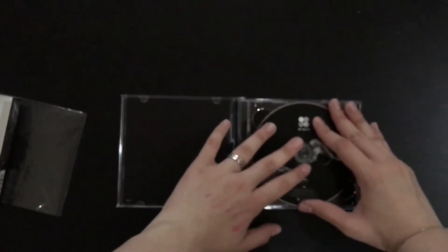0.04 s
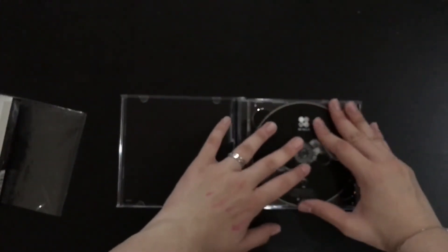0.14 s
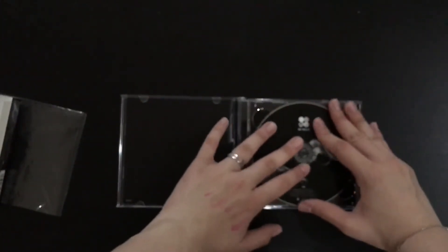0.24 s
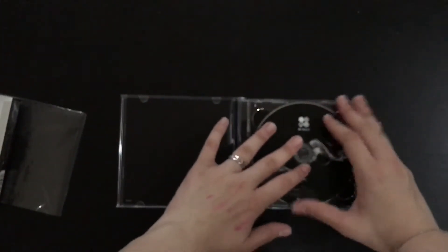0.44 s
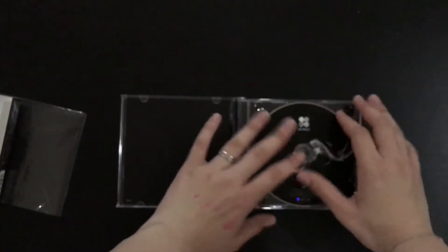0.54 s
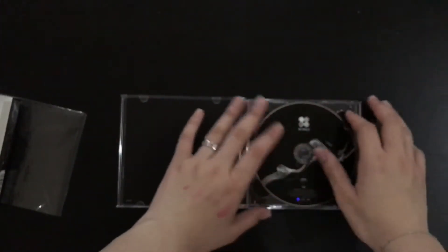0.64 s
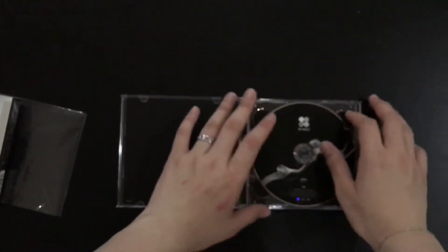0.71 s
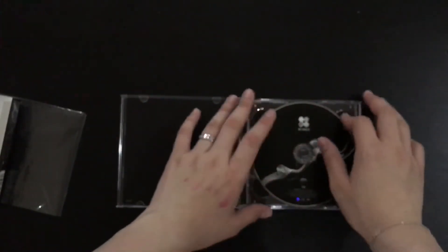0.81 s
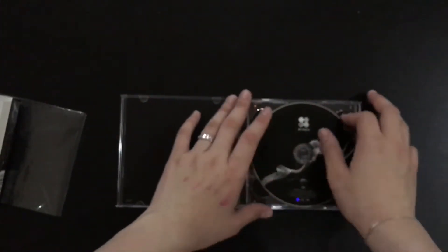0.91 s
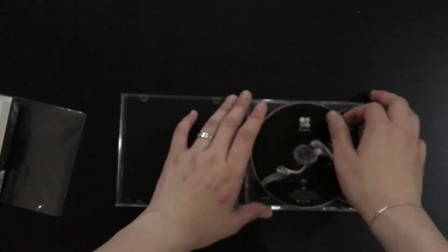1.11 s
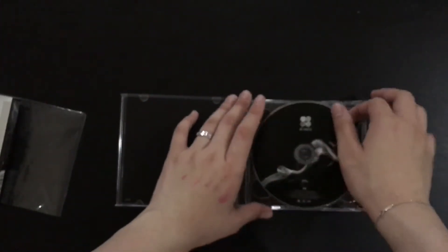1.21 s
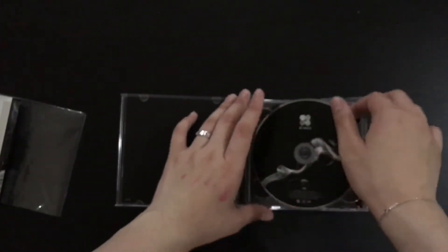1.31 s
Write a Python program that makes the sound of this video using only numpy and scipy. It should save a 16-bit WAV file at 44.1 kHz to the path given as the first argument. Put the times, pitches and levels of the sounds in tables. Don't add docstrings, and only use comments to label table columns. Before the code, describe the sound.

A disc snaps loudly onto a plastic case hub at about 0.21 s, a brittle crackle with a table thump and short small-room ring. Before it, faint hiss, low hum and tiny high finger squeaks. Soft rubbing and faint ticks follow around 0.5 s, two crisp edge clicks at 0.84 and 0.86, then a stuttering creak and scrape from 1.0 to 1.2, ending with small ticks near 1.3. Close microphone.

```python
import sys
import numpy as np
from scipy import signal
from scipy.fft import rfft, irfft
from scipy.io import wavfile
from scipy.ndimage import uniform_filter1d

SR = 44100
rng = np.random.default_rng(int(sys.argv[2]) if len(sys.argv) > 2 else 0)


def persist_wave(psi):
    counts = np.round(np.clip(psi, -1, 1) * 32767).astype(np.int16)
    wavfile.write(sys.argv[1], SR, np.atleast_2d(counts).T)


def volts(x):
    e = np.asarray(x, float) / 20
    return 10 ** e


N = 59535

# (frequency [Hz], level [dB per Hz])
HISS_TONE = [(90, -7.5), (130, 0.5), (350, -5), (700, -12), (1500, -14.5), (4000, -25.5), (16000, -28.5)]
# (frequency [Hz], level [dB per Hz])
HUM_TONE = [(25, -29.5), (45, 3.5), (62, -0.5), (97, -8.5), (125, -20), (200, -32)]
# (time [s], level [dB])
HUM_SWELL = [(0, -8), (.13, -1), (.3, -4), (.55, 2.5), (.75, 0), (1.0, -8), (1.1, -7.5), (1.25, -2),
             (1.35, -13.5)]
# (frequency [Hz], time to fade 60 dB [s])
ROOM_FADES = [(150, 0.25), (450, 0.39), (900, 0.49), (1800, 0.12), (4000, 0.49), (9000, 0.37), (14000, .17)]
ROOM_LEVELS = [-24, -19.5, -19.5, -27.5, -16.5, -25.5, -22]
TABLE_PITCHES = [202, 257, 344, 445, 490, 546, 748, 947, 1100, 1200, 1410]
# (level [dB], time to fade 60 dB [s])
TABLE_RINGS = [(-7, 0.048), (-6.5, 0.07), (-4.5, 0.073), (-2, 0.052), (-14, 0.091), (-12, 0.06), (2, 0.029),
               (-21, 0.049), (-11.5, .02), (-20, .1), (0.5, .05)]
# (time [s], level [dB])
BOOM_KNOCKS = [(.2105, -25), (.8655, -39), (1.2, -48), (1.012, -53.5), (1.3, -41), (1.242, -57), (.44, -57),
               (0.534, -53), (.325, -67)]
# (time [s], level [dB])
NUDGES = [(.555, -59), (0.725, -62.5), (1.177, -58.5), (1.186, -73), (1.191, -59.5), (1.197, -65),
          (1.222, -76), (1.343, -65.5)]
# (start [s], length [s], start pitch [Hz], middle pitch [Hz], end pitch [Hz])
SQUEAKS = [(.02, .09, 14500, 13900, 14500), (.038, .04, 15750, 15600, 15650),
           (.122, .022, 13000, 13250, 13600), (.165, .04, 12800, 13100, 13500),
           (.175, .03, 12300, 12100, 12600), (.51, .036, 13800, 13250, 12700),
           (.71, .075, 13000, 13700, 13900), (.72, .075, 12500, 13250, 12700)]
SQUEAK_LEVELS = [-78, -73, -80, -75, -77, -69, -82, -79]
# (time [s], level [dB])
RUB_PRESSURE = [(0, -74.5), (0.358, -64.5), (.47, -63.5), (.56, -59), (0.614, -64), (.63, -86),
                (0.859, -84), (.9, -69), (0.999, -73.5), (1.011, -62.5), (1.1, -67.5), (1.159, -68),
                (1.201, -65.5), (1.24, -74), (1.3, -74), (1.314, -70.5), (1.35, -64)]
# (frequency [Hz], level [dB per Hz])
RUB_TONE = [(100, -29.5), (350, 2), (1000, -8), (3300, -8.5), (8000, -13), (16000, -15.5)]
# (time [s], level [dB])
SCRAPE_PRESSURE = [(1.163, -99), (1.169, -56), (1.179, -57), (1.189, -53), (1.196, -43.5), (1.206, -61),
                   (1.228, -63.5), (1.25, -80)]
# (frequency [Hz], level [dB per Hz])
SCRAPE_TONE = [(150, 5), (400, 0), (1000, 6), (2200, 1), (3800, -2), (4600, -18), (5500, -40), (16000, -30)]
# (time [s], level [dB], centre [Hz], time to fade 60 dB [s])
TICKS = [(.002, -72, 3200, 0.12), (0.014, -80, 3060, .02), (0.0762, -61.5, 2960, 0.04),
         (0.077, -68.5, 9000, 0.02), (0.121, -81, 8000, .01), (0.12, -69.5, 3530, 0.019),
         (0.208, -33, 2440, 0.0063), (0.2175, -31, 1420, 0.045), (0.869, -71, 3180, 0.0067),
         (0.515, -75, 3860, 0.0063), (0.553, -63, 3270, 0.21), (0.567, -64.5, 7000, 0.016),
         (0.533, -63, 6980, 0.008), (0.586, -72, 3480, 0.016), (.727, -74, 3180, 0.1),
         (1.1786, -51, 3000, 0.011), (1.1852, -59.5, 2420, 0.0079), (1.1913, -47, 3000, 0.012),
         (1.1975, -61.5, 2400, 0.026), (1.172, -53, 3440, 0.012), (1.219, -61, 1110, 0.14),
         (1.313, -69, 6000, 0.0056), (1.3408, -57.5, 3230, 0.016), (1.3435, -55, 514, .03)]
# (start [s], end [s])
CREAK_SPAN = (1.011, 1.071)
# (start rate [Hz], end rate [Hz])
CREAK_RATES = (260, 170)
# (start level [dB], end level [dB])
CREAK_LEVELS = (-54, -56)
# (time [s], level [dB])
LONE_SLIPS = [(1.0112, -47.5), (1.0215, -71), (1.030, -48), (1.0765, -57), (1.0825, -51), (1.0915, -55),
              (1.0985, -49), (1.106, -54), (1.115, -49), (1.1228, -54), (1.130, -50), (1.137, -49),
              (1.1445, -56), (1.152, -48), (1.1665, -49.5), (1.169, -46), (1.216, -54), (1.304, -78),
              (1.315, -50.5)]
# (time [s], level [dB])
CREAK_DRAG = [(1.005, -92.5), (1.012, -70.5), (1.06, -60), (1.1, -72), (1.16, -78), (1.175, -55.5),
              (1.2, -71), (1.23, -100)]
# (frequency [Hz], width [Hz], level [dB])
CREAK_BODY = [(2000, 600, -4), (5200, 1200, -9), (6900, 900, -5), (9100, 1000, -1), (10000, 1200, -8),
              (12500, 3000, -10), (15300, 1200, -8)]
# (peak time [s], level [dB], swell [s], time to fade 60 dB [s], table thump [dB])
TAPS = [
    (0.8361, -40.5, 0.000072, 0.0042, -64.5),
    (0.8626, -41, 0.000109, 0.0073, -47.5),
]
# (frequency [Hz], width [Hz], level [dB])
TAP_BODY = [(3000, 1070, -2.5), (6600, 3500, -3.5), (11370, 1900, -2), (15450, 2000, -27)]
# (peak time [s], level [dB], swell [s], time to fade 60 dB [s], table thump [dB])
BOUNCES = [
    (0.8372, -48, 0.00025, 0.019, -51.5),
    (0.8653, -48, 0.0003, 0.018, -52),
    (0.8676, -47, 0.00027, 0.014, -51.5),
]
# (frequency [Hz], width [Hz], level [dB])
BOUNCE_BODY = [(450, 890, 3.5), (3120, 480, 1), (6530, 3300, -8.5)]
# (peak time [s], level [dB], swell [s], time to fade 60 dB [s], table thump [dB])
CRACKLES = [
    (0.2095, -35.5, .0006, 0.028, -32.5),
    (0.2127, -31, 0.0011, 0.008, -27.5),
    (0.216, -31.5, 0.00086, 0.0039, -24.5),
    (0.2206, -63.5, .001, .01, -29),
]
# (time [s], level [dB])
HARD_SLIPS = [
    (.2121, -18),
    (.2125, -12),
    (.2128, -3),
    (.2158, -24),
]
# (frequency [Hz], width [Hz], level [dB])
PLASTIC = [(743, 290, -2.5), (1420, 430, -3.5), (2310, 520, 0), (2960, 210, -15), (3220, 400, -9.5),
           (3590, 300, -16), (4686, 690, 3.5), (5910, 520, -13.5), (6990, 800, -11), (8740, 1500, -5),
           (10860, 510, -7), (11280, 1200, -4), (12700, 600, -10.5), (15400, 1500, -10)]


def unit(x):
    return x / np.sqrt(np.mean(x ** 2))


def noise():
    return rng.standard_normal(N)


def band(x, hz, width):
    return signal.lfilter(*signal.iirpeak(hz, hz / width, fs=SR), x)


def colour(x, points):
    hz, db = np.array(points).T
    f = np.arange(len(x) // 2 + 1) * SR / len(x) + 1
    gain_db = np.interp(np.log(f), np.log(hz), db, left=-80, right=-80)
    return unit(irfft(rfft(x) * volts(gain_db), len(x)))


def curve(points):
    return volts(np.interp(np.arange(N) / SR, *np.array(points).T))


def fade(t, t60):
    return np.exp(-t * np.log(1000) / t60)


def burst(at, db, swell, t60):
    t = np.arange(N) / SR - at
    return volts(db) * np.exp(np.where(t < 0, t / max(swell, 1e-4), -t * np.log(1000) / t60))


def bursts(rows):
    return sum(burst(*row[:4]) for row in rows)


def push(at, db, length=0.00048):
    return volts(db) * np.exp(-.5 * ((np.arange(N) / SR - at) / length) ** 2)


def clicks(rows):
    out = np.zeros(N)
    for at, db in rows:
        out[int(at * SR)] = volts(db)
    return out


def walk(rate):
    k = int(SR / rate)
    return unit(uniform_filter1d(uniform_filter1d(noise(), k), k))


def hiss():
    return volts(-67) * colour(noise(), HISS_TONE)


def hum():
    return volts(-52) * curve(HUM_SWELL) * colour(noise(), HUM_TONE)


def room(x):
    gap_s = 0.005
    t = np.arange(SR // 2) / SR
    tail = 0
    for (hz, t60), db in zip(ROOM_FADES, ROOM_LEVELS):
        echoes = unit(band(rng.standard_normal(len(t)), hz, 1.1 * hz))
        tail = tail + volts(db) * echoes * fade(t, t60)
    tail = tail * np.clip(t / gap_s - 1, 0, 1) * volts(-30.5)
    return signal.fftconvolve(x, tail)[:N]


def table(force):
    t = np.arange(SR // 2) / SR
    ring = sum(volts(db) * np.sin(2 * np.pi * hz * t) * fade(t, t60)
               for hz, (db, t60) in zip(TABLE_PITCHES, TABLE_RINGS))
    return signal.fftconvolve(force, ring)[:N] / 20


def boom():
    pitch_hz, t60_s, rise_s = 86.6, 0.22, 0.005
    t = np.arange(SR // 2) / SR
    ring = np.sin(2 * np.pi * pitch_hz * t) * fade(t, t60_s) * (1 - np.exp(-t / rise_s))
    return signal.fftconvolve(clicks(BOOM_KNOCKS), ring)[:N]


def nudges():
    return table(sum(push(*row) for row in NUDGES))


def squeaks():
    t, out = np.arange(N) / SR, 0
    for (at, length, start, middle, end), db in zip(SQUEAKS, SQUEAK_LEVELS):
        u = np.clip((t - at) / length, 0, 1)
        f = start * (1 - u) * (1 - 2 * u) + 4 * middle * u * (1 - u) + end * u * (2 * u - 1)
        level = volts(db + 2 * walk(200)) * np.sin(np.pi * u) ** .5
        out = out + level * np.sin(2 * np.pi * np.cumsum(f) / SR)
    return out


def rub():
    grains = colour(noise() * volts(2 * walk(400)), RUB_TONE)
    scrape = colour(noise() * volts(5.0 * walk(500)), SCRAPE_TONE)
    scraping = np.arange(N) / SR > SCRAPE_PRESSURE[0][0]
    return grains * curve(RUB_PRESSURE) + scrape * curve(SCRAPE_PRESSURE) * scraping


def ticks():
    knock_db = 11
    hits, out = noise(), 0
    for at, db, hz, t60 in TICKS:
        force = hits * burst(at, db, t60 / 120, t60) + clicks([(at, db + knock_db)])
        out = out + band(band(force, hz, hz), hz, hz)
    return out * volts(12.5)


def creak():
    t = np.arange(N) / SR
    running = (t >= CREAK_SPAN[0]) * (t <= CREAK_SPAN[1])
    rate = np.interp(t, CREAK_SPAN, CREAK_RATES) * (1 + 0.12 * walk(190))
    slips_left = np.cumsum((rate * running)[::-1])[::-1] / SR
    slips = np.abs(np.diff(np.ceil(slips_left), append=0))
    slips = slips * volts(np.interp(t, CREAK_SPAN, CREAK_LEVELS) + 2 * walk(170))
    slips = signal.lfilter([1], [1, -.985], slips + clicks(LONE_SLIPS))
    friction = (slips + curve(CREAK_DRAG)) * noise()
    return sum(volts(db) * band(friction, hz, w) for hz, w, db in CREAK_BODY)


def edge_ring(rows, body):
    return sum(volts(db) * band(noise() * bursts(rows), hz, w) for hz, w, db in body)


def taps():
    return (edge_ring(TAPS, TAP_BODY) + edge_ring(BOUNCES, BOUNCE_BODY)) * volts(7.5)


def thumps():
    snap_force = sum(push(row[0], row[4], 0.00018) for row in CRACKLES)
    tap_force = sum(push(row[0], row[4], 0.00028) for row in TAPS + BOUNCES)
    return table(snap_force + tap_force)


def snap():
    drive = noise() * bursts(CRACKLES) * volts(0.5) + clicks(HARD_SLIPS) * volts(1.5)
    ring = 0
    for k, (hz, w, db) in enumerate(PLASTIC):
        ring = ring + (-1) ** k * volts(db) * band(band(drive, hz, w), hz, w)
    return ring * volts(15.0) + volts(-22) * band(drive, 6000, 16000.0)


def scene():
    crack, thump, tap = snap(), thumps(), taps()
    small = ticks() + creak() + nudges()
    to_walls = clicks(HARD_SLIPS) * volts(11.0) + volts(-32.0) * crack + volts(-4) * thump
    echoes = room(to_walls + small + tap)
    background = hiss() + hum() + boom()
    return (background + squeaks() + rub() + small + tap + thump + crack + echoes)[None]


def band_limit(x):
    return signal.sosfilt(signal.butter(12, 16970, fs=SR, output="sos"), x)


def record(dry):
    top_hz, bass_cut_hz, loud_db = 15900, 72.5, -47
    top = signal.sosfiltfilt(signal.ellip(6, .2, 30, top_hz, "high", fs=SR, output="sos"), dry)
    soft_top = signal.sosfiltfilt(signal.butter(6, 16400, fs=SR, output="sos"), top)
    loud = uniform_filter1d(np.abs(top), size=64) > volts(loud_db)
    mix = signal.sosfiltfilt(signal.ellip(8, .2, 40, top_hz, fs=SR, output="sos"), dry)
    mix = mix + soft_top * uniform_filter1d(1. * loud, size=64)
    mix = signal.sosfilt(signal.butter(3, bass_cut_hz, "high", fs=SR, output="sos"), mix)
    return band_limit(mix)


dry = scene()
out = record(dry)
persist_wave(out)
```